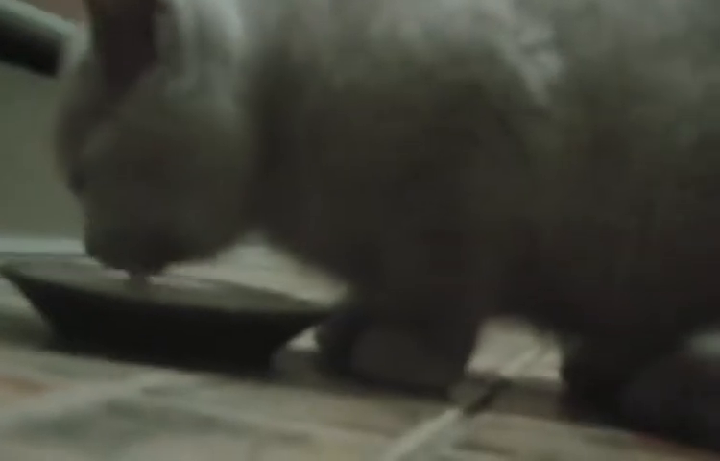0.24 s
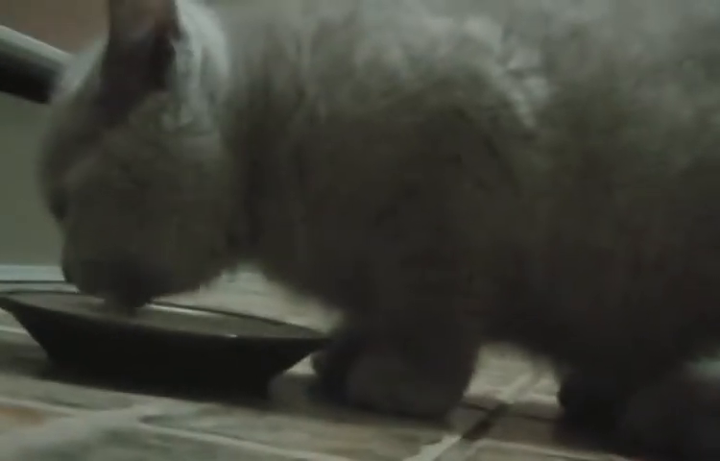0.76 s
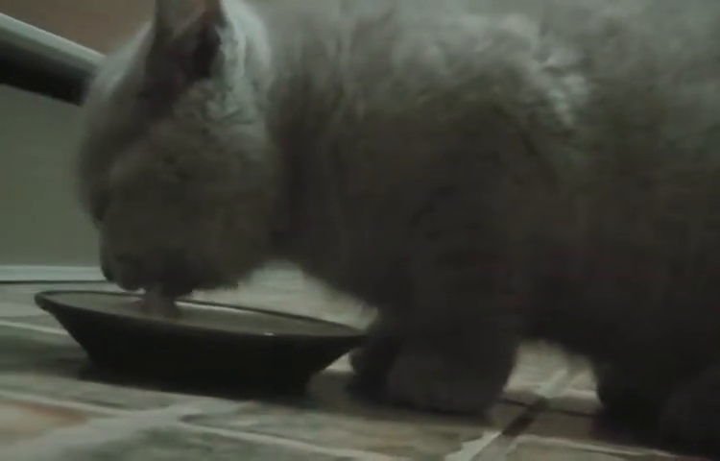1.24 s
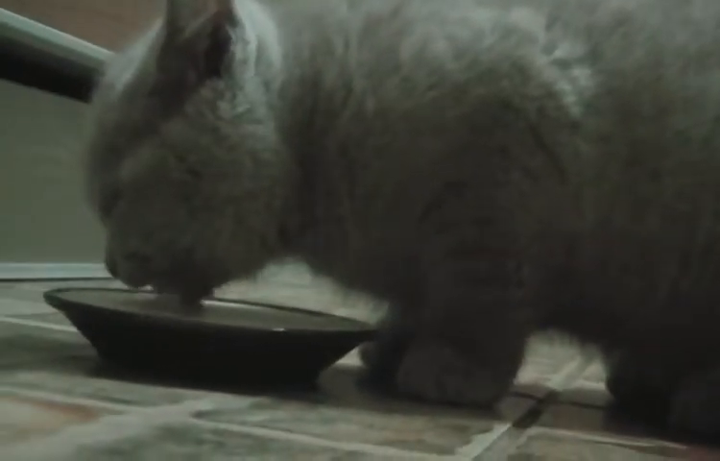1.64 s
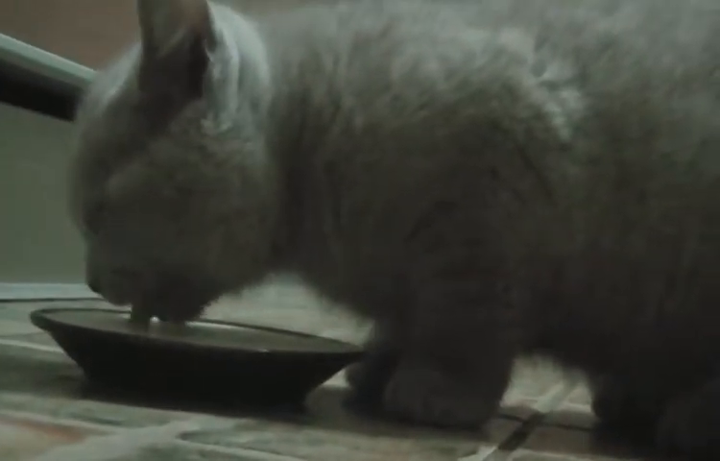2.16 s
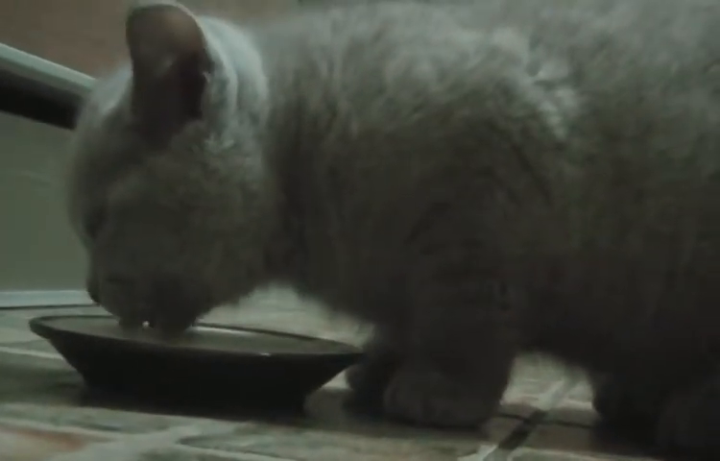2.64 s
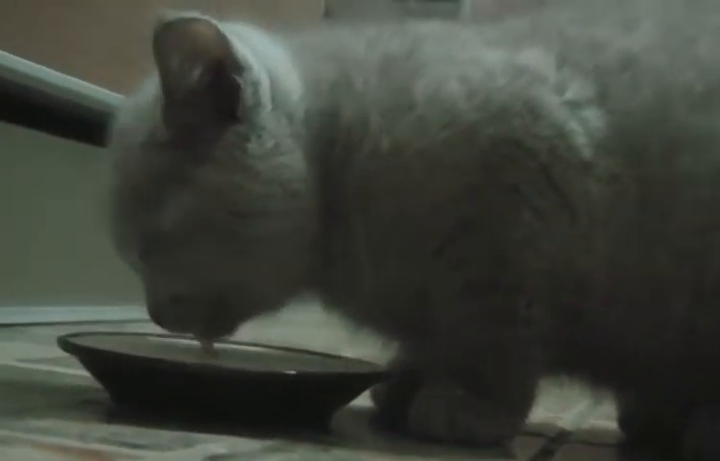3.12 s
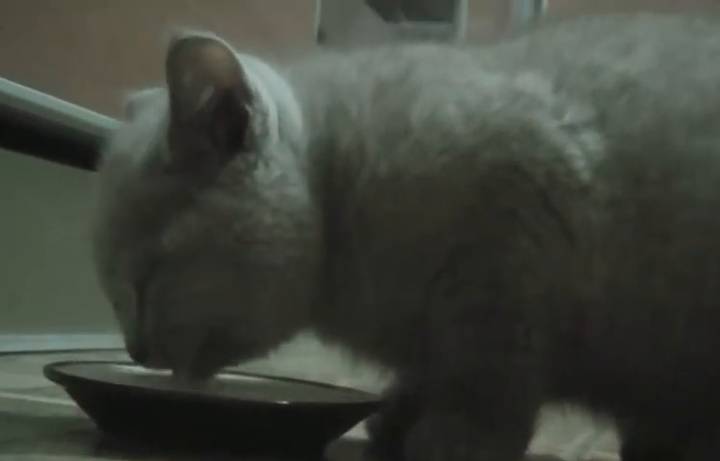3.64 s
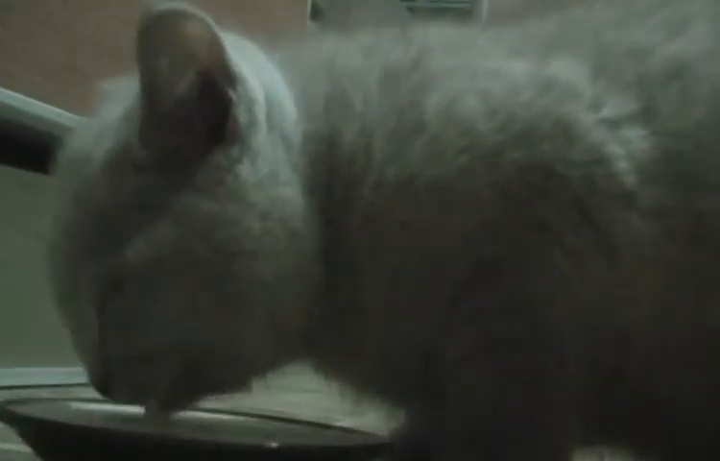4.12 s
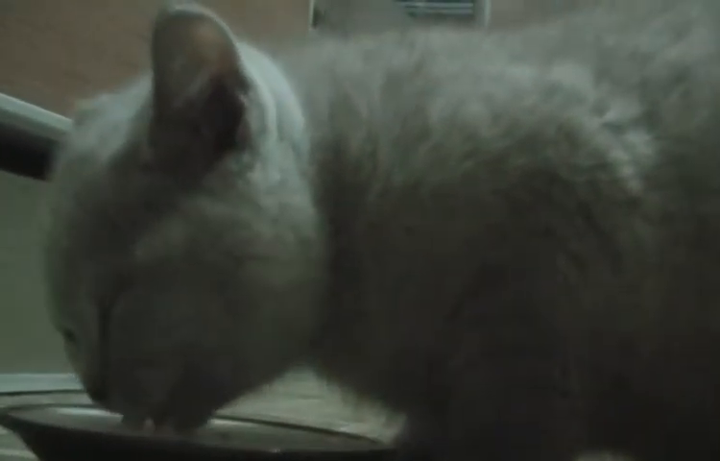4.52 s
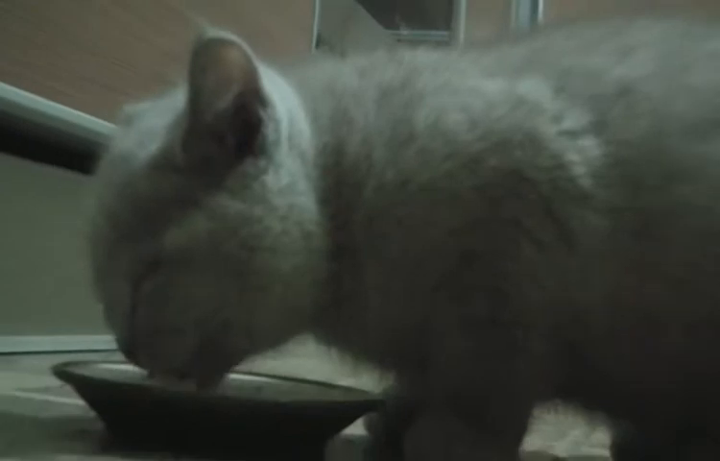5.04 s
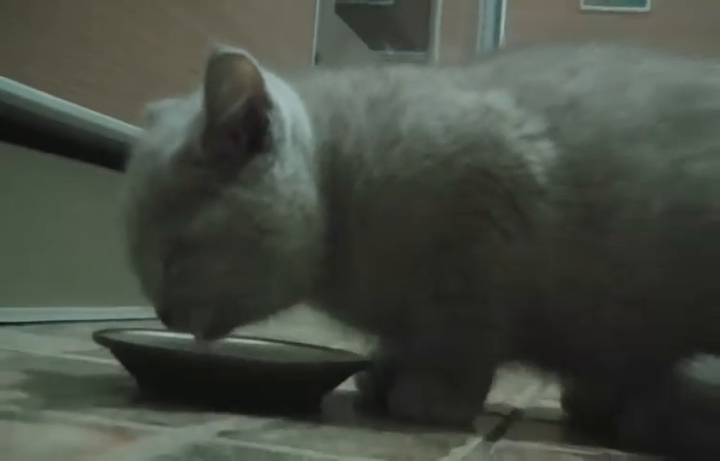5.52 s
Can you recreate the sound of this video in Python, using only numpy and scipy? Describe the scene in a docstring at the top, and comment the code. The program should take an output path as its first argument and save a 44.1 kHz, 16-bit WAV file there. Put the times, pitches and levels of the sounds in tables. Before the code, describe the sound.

In a small tiled kitchen, a kitten laps milk from a saucer close to a small camera microphone: irregular light wet smacks and ticks. A fridge hums steadily under soft rumble, hiss and a thin high whine. Three quick knocks grow louder early on, more follow around one second, a very loud bang comes just after two, then weaker thuds until three and a half. Afterwards the lapping stands clear, with little bubbly plips and a tiny slurp.

```python
"""Throughout, a fridge hums as shaft orders over rumble and airy noise, and a small camera whines and ticks.
From the start a kitten laps milk from a saucer on a tiled kitchen floor: damped mouth and film resonances.
From 0.35 s things are knocked about across the room (damped blows, a wall echo, floor modes and a noise tail),
with a faint bright crackle at first; crockery clinks near 1 s, bubbles ring from 1.4 s as rising damped sines,
cloth rustles (swelling noise) from about 2.1 s, and one slurp arches in pitch near 5.6 s."""
import sys
import numpy as np
from scipy import signal
from scipy.fft import rfft, irfft, next_fast_len
from scipy.io import wavfile
from scipy.ndimage import uniform_filter1d, map_coordinates

SR = 44100
rng = np.random.default_rng(int(sys.argv[2]) if len(sys.argv) > 2 else 0)


def master(y):
    """Save y as 16-bit WAV."""
    cut = np.clip(np.atleast_2d(y).T, -1, 1)
    pcm = np.round(cut * 32767)  # scale
    wavfile.write(sys.argv[1], SR, pcm.astype(np.int16))


N = 254456

# Spectrum shared by treble hiss and bright swells. Each row: frequency in Hz, relative density in dB per Hz.
TREBLE_SPECTRUM = [(1500, -31), (3500, 0), (6000, 0), (11000, -2.5), (13000, -4), (15500, -15)]


def amp(db):
    """Level law: the amplitude gain of a value in dB."""
    return 10 ** (np.asarray(db) / 20)


def unit(x):
    """Power normalisation: scales x to rms 1."""
    return x / np.sqrt(np.mean(x ** 2) + 1e-20)


def along(points, hz):
    """Logarithmic frequency scale: interpolates (Hz, value) points on a log axis."""
    f, v = np.transpose(points)
    return np.interp(np.log(hz + 1), np.log(f + 1), v)


def curves(rows):
    """Linear interpolation in time: one value per sample for each column after the seconds."""
    s, *cols = np.transpose(rows)
    return [np.interp(np.arange(N) / SR, s, c) for c in cols]


def wobble(rate):
    """Slow random modulation: a smooth curve through random knots, rate of them a second."""
    knots = rng.standard_normal(int(N * rate / SR) + 4)
    return map_coordinates(knots, [np.arange(N) * rate / SR])


def rush(spectrum, size=N, patchy_db=0, decays=False):
    """Partly coherent stereo noise: shaped in spectrum, patchy in level, with optional reverberant decay."""
    # Likeness of left and right. Each row: frequency in Hz, correlation (1 is identical).
    likeness = [(30, 0.81), (80, 1), (300, 0.86), (640, 0.77), (1400, 0.24), (3000, 0), (11000, 0.13),
                (13000, 0.87)]
    # Reverberation of the kitchen. Each row: frequency in Hz, time to fall 60 dB in seconds.
    kitchen_t60 = [(60, 1), (250, 0.3), (1000, 0.53), (4000, 0.52), (12000, 0.61)]
    hz, t, z = signal.stft(rng.standard_normal((2, size)), SR, nperseg=512)
    field = uniform_filter1d(rng.standard_normal(z.shape[1:]), size=6, axis=0)
    field = uniform_filter1d(field, size=10, axis=1)
    pair = signal.istft(z * amp(patchy_db * unit(field)), SR, nperseg=512)[1][:, :size]

    f = np.fft.rfftfreq(size, 1 / SR)
    # the angle shares power between mid and side so that left and right correlate as listed
    turn = np.arccos(np.clip(along(likeness, f), -1, 1)) / 2
    shaped = rfft(pair) * amp(along(spectrum, f))
    mid, side = irfft(shaped * [np.cos(turn), np.sin(turn)], size)
    out = unit(np.array([mid + side, mid - side]))
    if decays:
        z = signal.stft(out, SR, nperseg=512)[2]
        z = z * amp(-60 * t / along(kitchen_t60, hz)[:, None])
        out = signal.istft(z, SR, nperseg=512)[1][:, :size]
    return out


def ring(t, hz, t60, rise=0):
    """Damped resonance: a decaying sine from t = 0, its phase run ahead by the share rise at t60."""
    t = np.clip(t, 0, None)
    phase = 2 * np.pi * hz * t * (1 + rise * np.minimum(t / t60, 1))
    return amp(-60 * t / t60) * np.sin(phase)


def add(out, s, x):
    """Superposition: mixes x into out from second s."""
    part = out[:, round(s * SR):][:, :x.shape[-1]]
    part += x[..., :part.shape[1]]


def deep_rumble():
    """Low-frequency noise under a slow amplitude modulation."""
    # Each row: frequency in Hz, relative density in dB per Hz.
    rumble_spectrum = [(15, 7), (30, 23), (50, 20.5), (75, -9), (130, -26), (300, -42)]
    # Each row: time in seconds, mean level in dB.
    rumble_level = [(0, -38.5), (.9, -39.5), (1.7, -36), (2.8, -39.5), (3.6, -42), (4.4, -43.5),
                    (5.1, -42.5), (5.77, -39)]
    level_db = curves(rumble_level)[0] + 1.2 * wobble(7)
    return amp(level_db) * rush(rumble_spectrum, patchy_db=0.0)


def room_air():
    """Broadband diffuse noise, with a steady treble hiss above it."""
    # Each row: frequency in Hz, relative density in dB per Hz.
    air_spectrum = [(40, -14), (100, 2), (240, -0.5), (500, -4), (1100, -6.5), (1700, -12.5), (2300, -20),
                    (3500, -22.5), (5200, -23), (6500, -58)]
    air_db, hiss_db = -40, -54  # mean levels
    air = amp(air_db + 0.19 * wobble(9.8)) * rush(air_spectrum, patchy_db=1.56)
    return air + amp(hiss_db) * rush(TREBLE_SPECTRUM, patchy_db=1.4)


def bright_swells():
    """Noise under an envelope that swells, holds and fades: a faint crackle, then two rustles of cloth."""
    # The crackle, then the two rustles. Each row: start in seconds, hold in seconds, level in dB.
    swells = [(.36, 0.035, -55), (2.14, 0.16, -44.5), (2.74, .25, -48.5)]
    rise_s, fade_db_per_s = 0.13, 46
    t, envelope = np.arange(N) / SR, np.zeros(N)
    for s, held, db in swells:
        fading_s = np.clip(t - s - rise_s - held, 0, None)
        envelope += np.clip((t - s) / rise_s, 0, 1) * amp(db - fade_db_per_s * fading_s)
    return envelope * rush(TREBLE_SPECTRUM, patchy_db=2.4)


def fridge():
    """Rotating machinery: harmonics of the compressor shaft, and fixed hums, swaying in level and phase."""
    # Compressor speed. Each row: time in seconds, turns a second.
    shaft_speed = [(0, 30.46), (2, 30.48), (3.5, 30.53), (5.77, 30.57)]
    # Each value: mean level in dB, for shaft orders 10 to 15 in turn.
    orders_db = [-48.5, -41, -52, -56.5, -54, -78]
    # Each row: frequency of another hum in Hz, mean level in dB.
    other_hums = [(100, -48.5), (562.7, -59.5), (662.7, -46), (909, -64.5), (1100, -61), (1824, -78),
                  (3667, -73.5)]
    turns = np.cumsum(curves(shaft_speed)[0]) / SR
    t, out = np.arange(N) / SR, np.zeros((2, N))
    partials = [(order * turns, db) for order, db in enumerate(orders_db, start=10)]
    partials += [(hz * t, db) for hz, db in other_hums]
    for cycles, db in partials:
        # a shared sway in dB, plus one for each side
        sway_db = 1.3 * wobble(6) + 1.2 * np.array([wobble(4), wobble(4)])
        drift_cycles = rng.random() + .05 * wobble(5)
        phase = 2 * np.pi * (cycles + drift_cycles) + [[.12], [-.12]]
        out += np.sqrt(2) * amp(db + sway_db) * np.sin(phase)
    return out


def camera():
    """Modulation sidebands: they break the whine once a field; a small damped tick follows each break."""
    # Sidebands of the whine. Each row: offset in steps of half the field rate, level in dB rms.
    sidebands = [(-12, -78), (-10, -75), (-8, -75), (-6, -72), (-4, -68), (-2, -63), (-1, -66), (1, -70),
                 (2, -77), (12, -79), (14, -80)]
    # Thin steady tones. Each row: frequency in Hz, level in dB rms.
    thin_tones = [(6500, -75), (9350, -71), (9400, -84)]
    whine_hz, field_hz = 13025, 50
    t = np.arange(N) / SR
    since = t - .0085  # seconds from the first break
    whine = amp(-52.0) * np.cos(2 * np.pi * whine_hz * since)
    # even sidebands oppose the tone at the break; odd ones, a quarter turn off, bend its pitch
    for k, db in sidebands:
        sideband_hz = whine_hz + k * field_hz / 2
        whine -= amp(db) * np.cos(2 * np.pi * sideband_hz * since + k % 2 * np.pi / 2)
    for hz, db in thin_tones:
        whine += amp(db) * np.cos(2 * np.pi * hz * t)
    out = np.sqrt(2) * np.array([whine, whine])

    short = np.arange(600) / SR
    for s in np.arange(.0095, N / SR, 1 / field_hz):
        pitch, level, sign = rng.standard_normal((3, 2, 1))  # each side its own
        tick = ring(short, 5100 * (1 + 0.043 * pitch), 0.012) * (1 - np.exp(-short / 0.00093))
        add(out, s, amp(-40 + 2.6 * level) * np.sign(sign) * tick)
    return out


def knocks():
    """Impact and reverberation: a dull blow, its wall echo, booming floor modes and a decaying noise tail."""
    # Each row: start in seconds, level in dB, blow in Hz, hardness in dB per octave, then boom in dB,
    # wall echo in dB, echo in Hz and tail in dB; the last three levels are relative to the first.
    blows = [(0.3504, -18.5, 536, -2.2, -9.5, -8, 300, -8), (.4065, -13.5, 570, -1, -17, -7, 400, -10),
             (0.4737, -6, 536, -5, -14, -10, 280, -8.5), (1.0214, -16, 662, .6, -4.5, -3, 198, -9),
             (1.1915, -27, 640, 0, -8, -5, 500, -7), (2.151, -2, 454, 2.5, -8, 0, 265, -9.5),
             (2.6124, -12, 562, -1.7, -9.5, 0, 303, -9), (3.2109, -14, 552, 0.5, -8.5, 1.7, 615, -9.5),
             (3.4978, -26.5, 385, 0, -6.5, -9, 300, -11)]
    # Modes of floor and cupboards. Each row: frequency in Hz, mean level in dB, time to fall 60 dB in seconds.
    floor_modes = [(75.3, -3.5, 0.56), (107.5, -0.5, 0.28), (181.3, -3, 0.18), (290.5, -11.5, 0.33),
                   (411.7, -8.5, 0.3), (475, -15, 0.12), (548, -13, 0.4), (694.4, -9.5, 0.29)]
    # Spectrum of the dull tail. Each row: frequency in Hz, density before hardness in dB per Hz.
    thud_spectrum = [(60, -9.5), (180, 1.5), (450, 1.5), (750, -0.5), (1100, -5.5), (1600, -9.5),
                     (2300, -24), (4000, -70)]
    # Spectrum of the bright tail. Each row: frequency in Hz, relative density in dB per Hz.
    crack_spectrum = [(1200, -24), (2200, 8), (4500, 3.5), (8000, -7), (15000, -21)]
    echo_delay_s = .0138
    crack_base_db, echo_edge_base_db = -26, -22
    crack_per_hardness = 1.34  # harder blows crack more
    out, t = np.zeros((2, N)), np.arange(30720) / SR
    late, swell = np.clip(t - echo_delay_s, 0, None), 1 - np.exp(-t / 0.0032)
    for s, db, hz, hard_db, boom_db, echo_db, echo_hz, tail_db in blows:
        extra_db = crack_per_hardness * hard_db
        direct = ring(t, hz, 0.047) + 0.39 * ring(t, 1290, 0.012)
        direct = direct * (1 - np.exp(-t / 0.00064))

        echo = 1.87 * ring(late, echo_hz, 0.013)
        echo += 0.45 * amp(hard_db) * ring(late, 1170, 0.013)
        echo += amp(echo_edge_base_db + extra_db) * ring(late, 1470, 0.011)

        boom = np.zeros((2, len(t)))
        for f, level, t60 in floor_modes:
            mode_db = level + rng.normal(0, 1.6) + rng.normal(0, .8, (2, 1))
            boom += amp(mode_db) * ring(t - .003, f, t60)

        # hardness tilts the tail above 500 Hz
        tilted = [(f, level + hard_db * np.log2(max(f, 500) / 500)) for f, level in thud_spectrum]
        tail = amp(tail_db) * rush(tilted, size=len(t), patchy_db=1.36, decays=True)
        crack = rush(crack_spectrum, size=len(t), patchy_db=1.0, decays=True)
        tail += amp(crack_base_db + extra_db) * crack

        room = swell * (amp(boom_db) * boom + tail)
        add(out, s, amp(db) * (0.65 * direct + amp(echo_db) * echo + room))
    return out


def crockery():
    """Struck-solid modes: a clink of two inharmonic damped partials."""
    # Each row: start in seconds, level in dB, frequency in Hz, time to fall 60 dB in seconds.
    clinks = [(1.023, -28.5, 2670, 0.046)]
    out, t = np.zeros((2, N)), np.arange(30720) / SR
    for s, db, hz, t60 in clinks:
        add(out, s, amp(db) * (ring(t, hz, t60) + 1.45 * ring(t, 0.91 * hz, 0.41 * t60)))
    return out


def smack(db, mouth_hz, film_hz, film_db):
    """Cavity and film resonance: the tongue leaves the milk, the mouth gap rings and the film snaps."""
    mouth_left_db, film_left_db, side_scatter_db = -0.7, 8.5, 3.5  # left over right
    # the left port hears it first
    t = np.arange(700) / SR - .0006 - np.array([[0], [.00005]])
    rise = 1 - np.exp(-np.clip(t, 0, None) / 0.00053)
    spread = 1 + 0.078 * rng.standard_normal((4, 2, 1))  # each port hears its own colour
    ports = np.array([[.5], [-.5]])
    scatter_db = side_scatter_db * rng.standard_normal()

    mouth = ring(t, mouth_hz, 0.008)
    mouth += 1.26 * ring(t, 1.088 * spread[0] * mouth_hz, 0.0067)
    mouth += 0.66 * ring(t, 0.786 * spread[1] * mouth_hz, 0.0073)

    film = ring(t, film_hz, 0.0061)
    film += 1.26 * ring(t, 1.18 * spread[2] * film_hz, 0.0041)
    film += 0.52 * ring(t, 0.8 * spread[3] * film_hz, 0.0074)

    both = amp(mouth_left_db * ports) * mouth + amp(film_db + film_left_db * ports) * film
    return amp(db + scatter_db * ports) * rise * both


def laps():
    """Repeated release of a wet surface: the listed tongue smacks and a random scatter of tiny wet ticks."""
    # Each row: start in seconds, level in dB, mouth in Hz, film in Hz, film over mouth in dB.
    tongue_smacks = [(.135, -41, 2450, 7200, 8), (.2209, -35, 4360, 6400, -14),
                     (.3102, -42.5, 4650, 7600, 8), (.6343, -43, 4000, 8600, 8),
                     (0.6988, -26.5, 4600, 5700, -13), (.761, -30, 4420, 5700, -6),
                     (.987, -34, 4480, 7320, .3), (1.178, -28.5, 2380, 6400, -15),
                     (1.194, -31, 2440, 5700, -8), (1.2164, -24, 4900, 5560, -7),
                     (1.4207, -33, 5250, 5700, -6), (1.764, -37, 3570, 5600, 0),
                     (1.835, -30, 3240, 7500, -9), (1.9108, -28.5, 5200, 5830, -7),
                     (2.01, -34, 3640, 5600, -2), (2.083, -30.5, 3690, 5700, -7),
                     (2.5416, -25, 4340, 7200, -3.5), (2.821, -34, 4800, 5700, 5),
                     (2.862, -31, 4700, 5900, -6), (3.089, -32, 2130, 6000, -18),
                     (3.113, -26, 4350, 5700, -7), (3.2776, -18.5, 4760, 6900, -10),
                     (3.5468, -36, 3750, 5600, -6), (3.5818, -35, 3020, 6000, -14),
                     (3.5915, -32, 3780, 6000, -16), (3.6296, -23, 4960, 6050, -2),
                     (3.689, -32, 3750, 6500, -9), (3.831, -28.5, 4260, 5600, -13),
                     (3.91, -32, 2680, 6260, -4), (3.952, -28, 3700, 6200, -9),
                     (4.123, -19.5, 4700, 5630, -13), (4.1574, -36, 4300, 7300, 7),
                     (4.2, -31.5, 3320, 6200, -2), (4.2842, -34.5, 2340, 6400, -16),
                     (4.2967, -35, 2100, 6500, -14), (4.367, -18.5, 3730, 9500, 1),
                     (4.541, -25.5, 3740, 6000, -7), (4.559, -28.5, 4600, 6760, 8.5),
                     (4.7054, -39, 5060, 7600, 10), (4.7496, -36, 4220, 5600, -6),
                     (4.788, -31, 3500, 5900, -15), (4.8944, -36, 2510, 6500, -14),
                     (4.9322, -30, 5040, 5600, -15), (4.9816, -36, 3500, 6900, -12),
                     (4.9903, -35, 3600, 7000, -7), (5.1466, -32.5, 4400, 6200, -11),
                     (5.2076, -35, 4050, 5600, -9), (5.234, -35, 2760, 6000, -16),
                     (5.2879, -32, 3970, 6500, -16), (5.418, -28, 4100, 6400, -17),
                     (5.451, -34, 4260, 6000, -11), (5.464, -34, 3970, 6000, -12),
                     (5.529, -34, 4600, 6500, -6), (5.6378, -24, 2160, 3930, -1.5),
                     (5.681, -30, 3350, 5500, -12), (5.69, -28, 3620, 5600, -14),
                     (5.695, -21.5, 4230, 5960, -8)]
    out = np.zeros((2, N))
    for s, *row in tongue_smacks:
        add(out, s, smack(*row))
    for when, size, pitch in rng.random((300, 3)):
        tick_db = -49.5 - 4.8 * np.log(size + 0.025)  # mostly faint, a few louder
        tick = smack(db=tick_db, mouth_hz=2100 * 2.6 ** pitch, film_hz=6400, film_db=-14)
        add(out, when * N / SR, tick)
    return out


def bubbles():
    """Bubble resonance: a damped sine of rising pitch; the bubble's skin pops as it forms."""
    # Each row: start in seconds, level in dB, initial pitch in Hz, time to fall 60 dB in seconds.
    milk_bubbles = [(1.369, -26.5, 1500, 0.01), (4.19, -23.5, 950, 0.011), (4.361, -19, 1420, 0.0069),
                    (4.895, -28, 1310, 0.013), (5.533, -17.5, 715, 0.011), (5.638, -18, 1130, 0.0092)]
    out, t = np.zeros((2, N)), np.arange(3000) / SR
    for s, db, hz, t60 in milk_bubbles:
        skin = .25 * ring(t, 4.5 * hz, 0.59 * t60)
        body = ring(t, hz, t60, rise=0.043)
        add(out, s, amp(db) * (body + skin) * (1 - np.exp(-t / 0.00044)))
    return out


def slurp():
    """Frequency modulation: one short tone arches up in pitch and back at an uneven level."""
    start_s, length_s, base_hz, arch_share, mean_db = 5.602, 0.0207, 860, 0.33, -31
    out = np.zeros((2, N))
    u = np.arange(round(length_s * SR)) / (length_s * SR)  # 0 to 1 over the slurp
    pitch_hz = base_hz * (1 + arch_share * np.sin(np.pi * u))
    uneven_db = np.interp(u, np.linspace(0, 1, num=8), rng.normal(0, 3, size=8))
    envelope = amp(mean_db + uneven_db) * np.sqrt(np.sin(np.pi * u))
    add(out, start_s, envelope * np.sin(2 * np.pi * np.cumsum(pitch_hz) / SR))
    return out


def kitten():
    """Convolution reverberation: saucer, tiles and room answer the lapping with decaying noise."""
    out = laps() + bubbles() + slurp()
    t = np.arange(SR // 5) / SR
    # a strong short decay and a weak long one, both after 2 ms
    decay = amp(-29 - 60 * t / .025) + amp(-43 - 60 * t / .3)
    answer = decay * (t > .002) * rng.standard_normal((2, len(t)))
    return out + signal.fftconvolve(out, answer, axes=1)[:, :N]


def scene():
    """Linear superposition of every source at the two microphone ports."""
    background = deep_rumble() + room_air() + bright_swells()
    return background + fridge() + camera() + knocks() + crockery() + kitten()


def record(dry):
    """Microphone response: slight left bias, bass cut, soft saturation near full scale, then a band limit."""
    top_hz = 15500
    bass_cut = signal.butter(2, 45, "high", fs=SR, output="sos")
    thin = signal.sosfilt(bass_cut, dry * amp([[.3], [-.3]]))
    clipped = thin / (1 + abs(thin) ** 8) ** (1 / 8)
    m = next_fast_len(N + 8192)
    kept = np.fft.rfftfreq(m, 1 / SR) < top_hz
    return irfft(rfft(clipped, m) * kept, m)[:, :N]


dry = scene()
out = record(dry)
master(out)
```